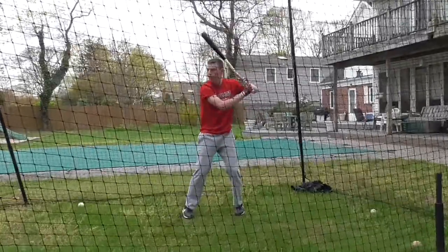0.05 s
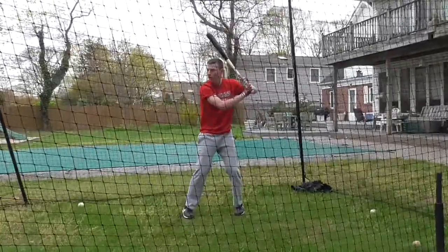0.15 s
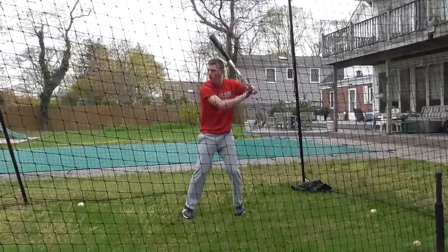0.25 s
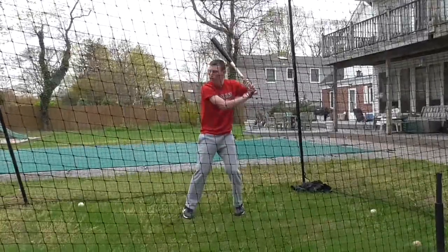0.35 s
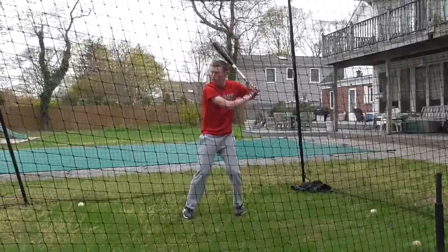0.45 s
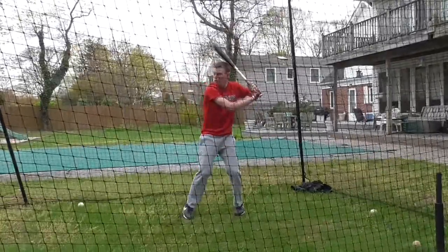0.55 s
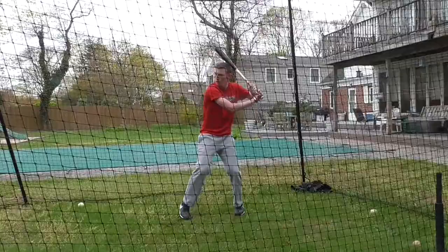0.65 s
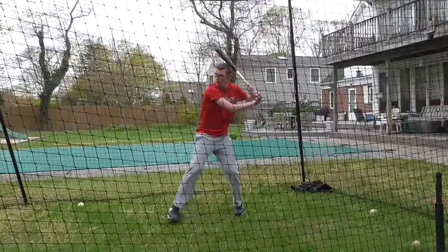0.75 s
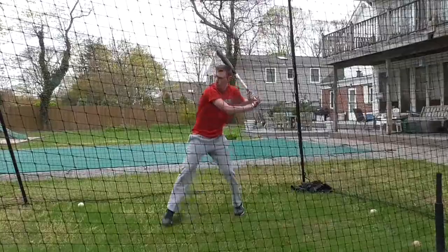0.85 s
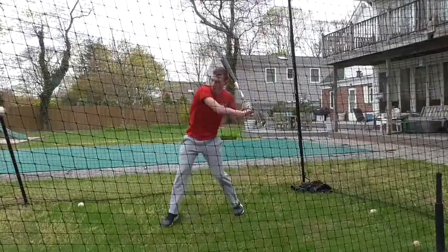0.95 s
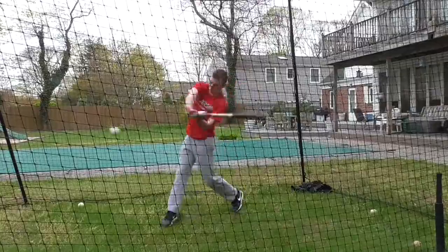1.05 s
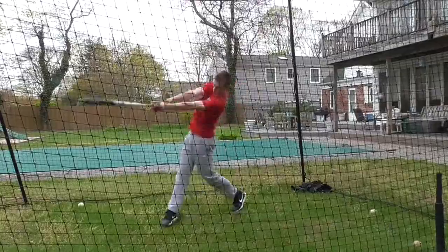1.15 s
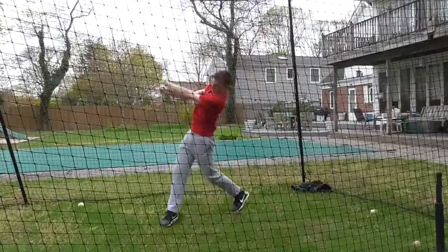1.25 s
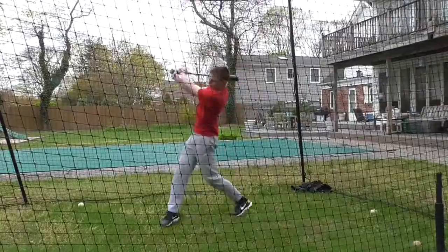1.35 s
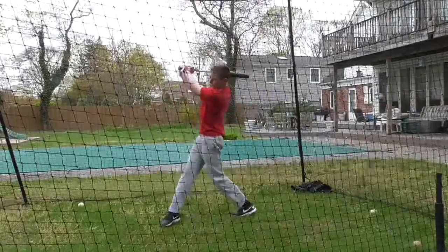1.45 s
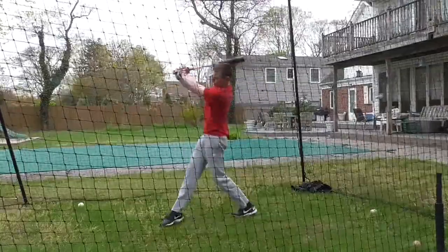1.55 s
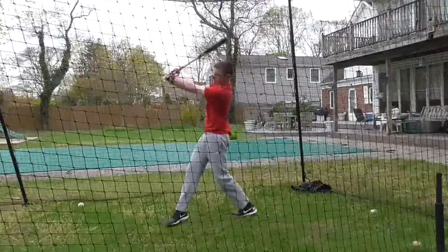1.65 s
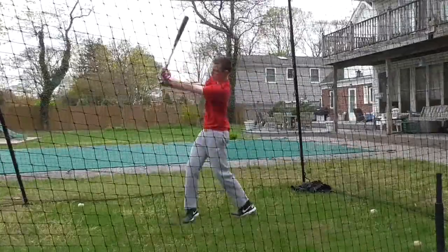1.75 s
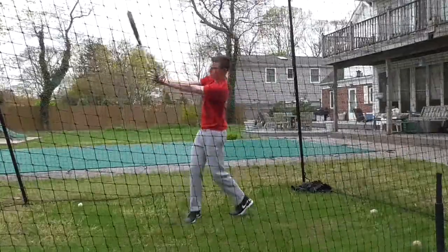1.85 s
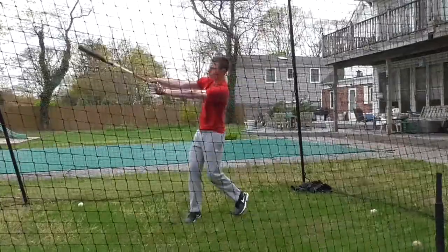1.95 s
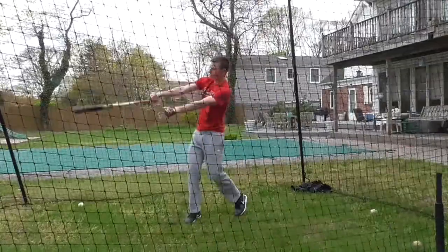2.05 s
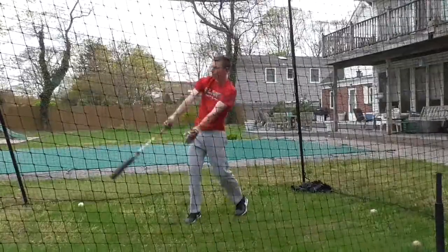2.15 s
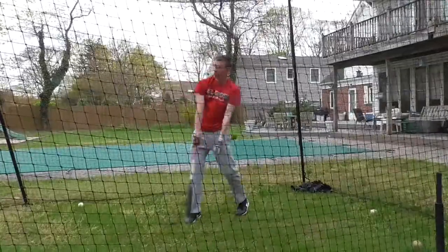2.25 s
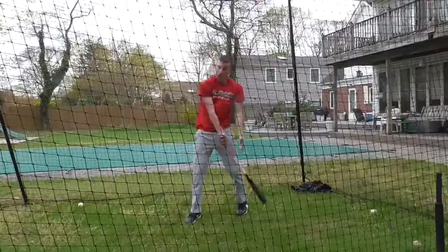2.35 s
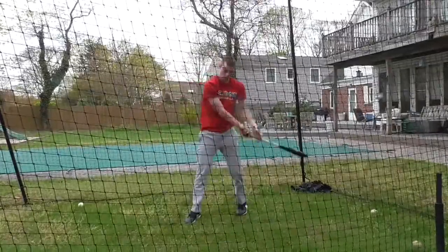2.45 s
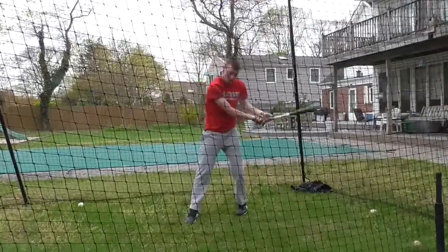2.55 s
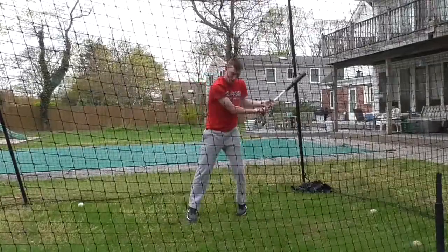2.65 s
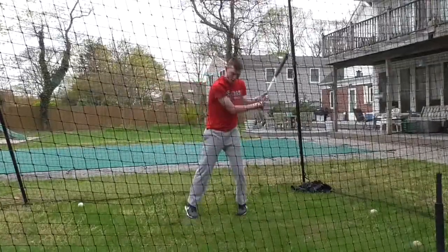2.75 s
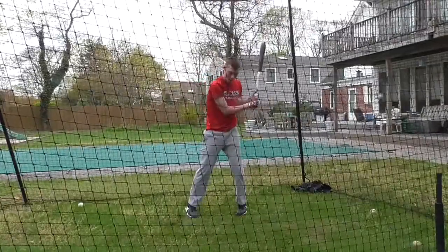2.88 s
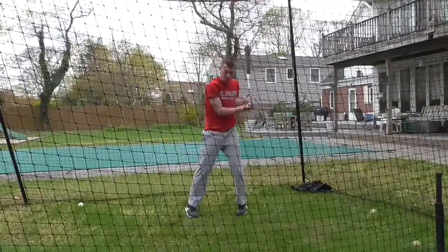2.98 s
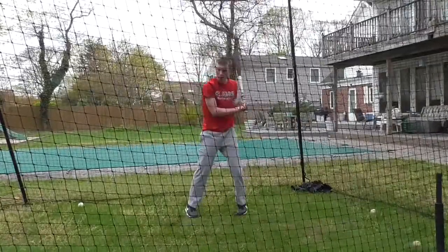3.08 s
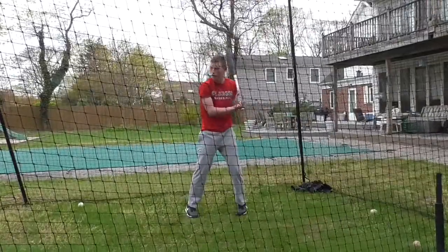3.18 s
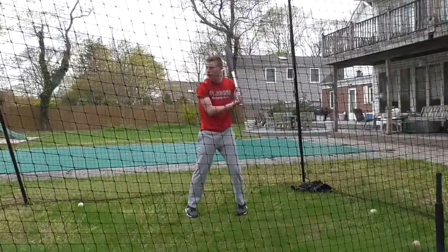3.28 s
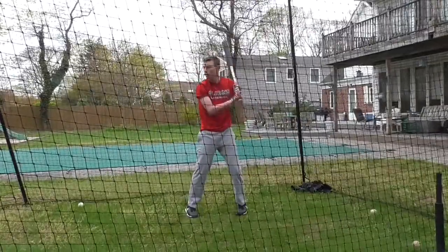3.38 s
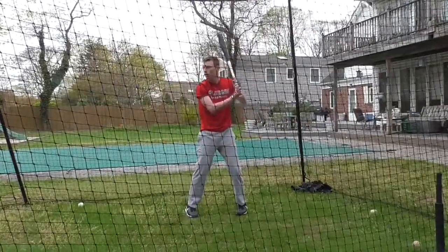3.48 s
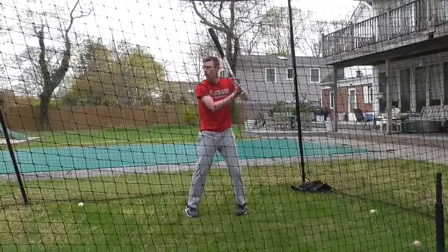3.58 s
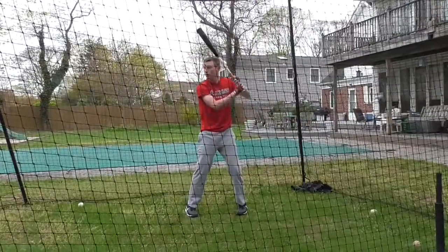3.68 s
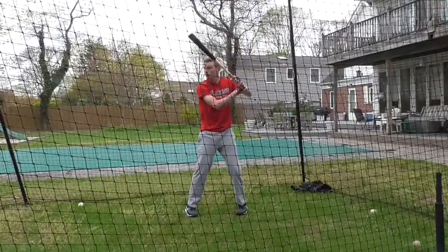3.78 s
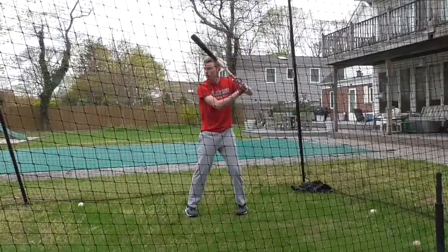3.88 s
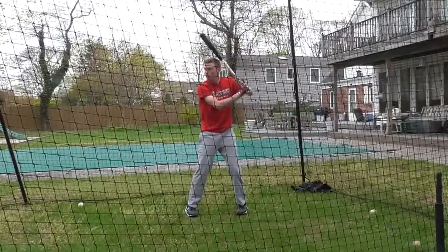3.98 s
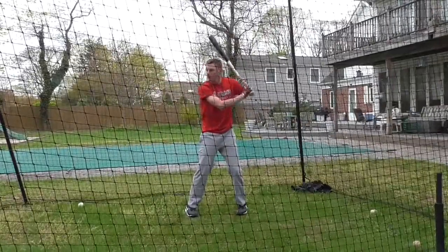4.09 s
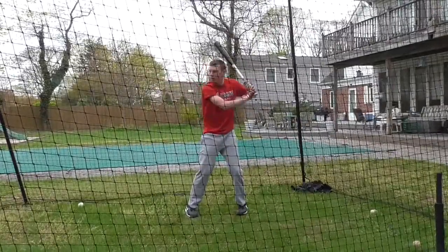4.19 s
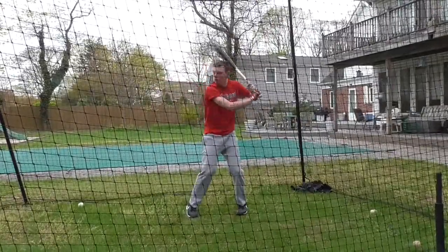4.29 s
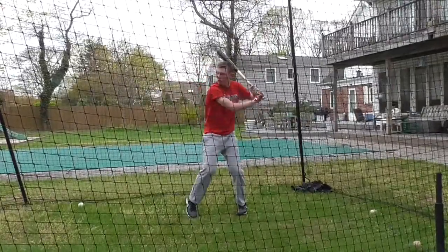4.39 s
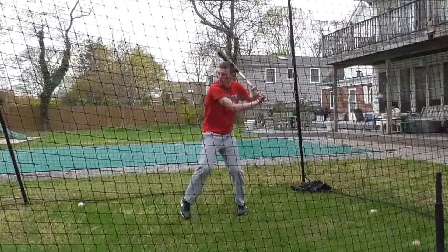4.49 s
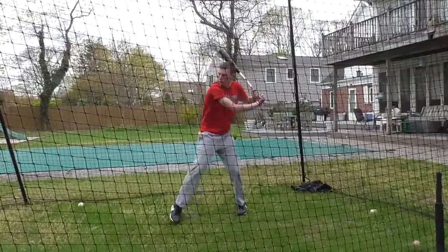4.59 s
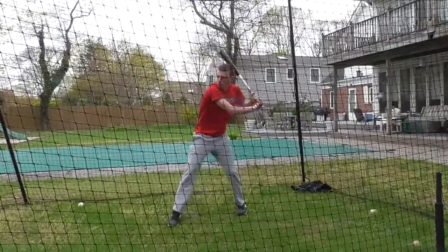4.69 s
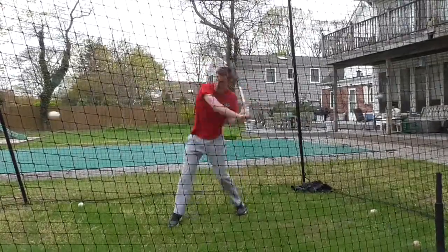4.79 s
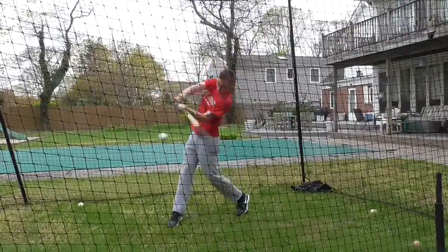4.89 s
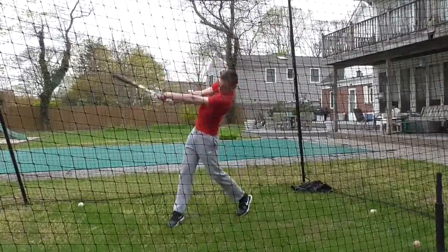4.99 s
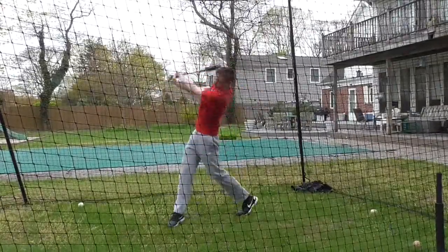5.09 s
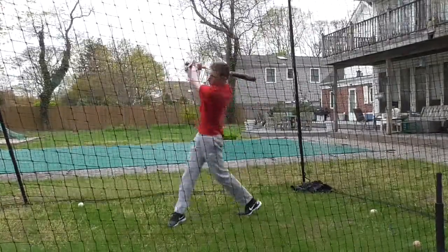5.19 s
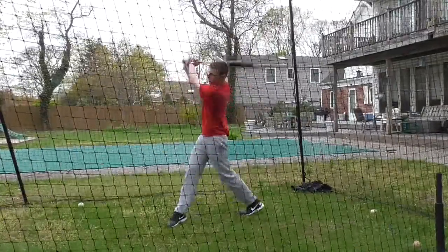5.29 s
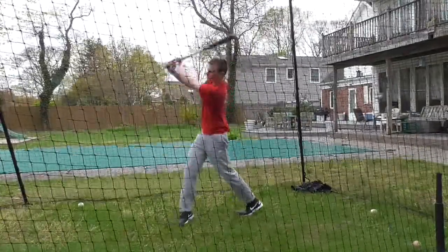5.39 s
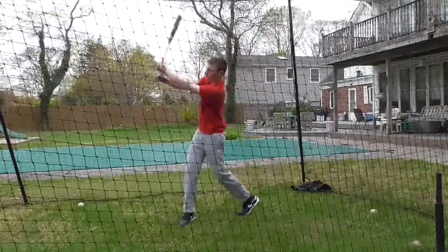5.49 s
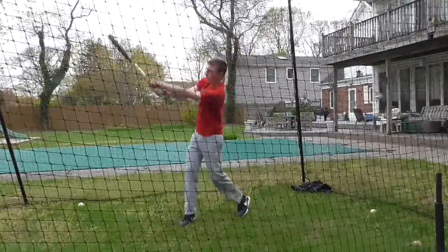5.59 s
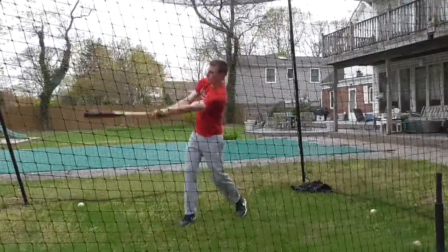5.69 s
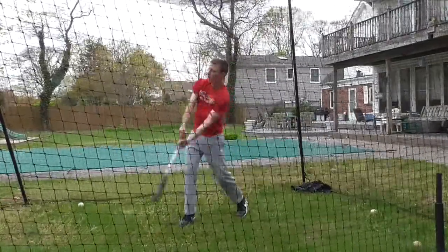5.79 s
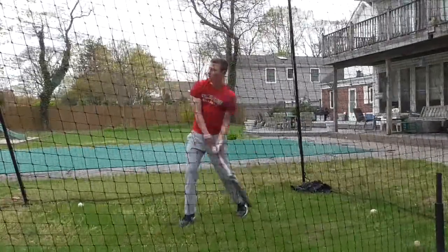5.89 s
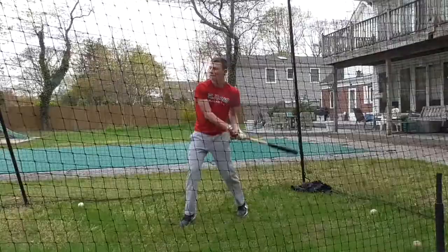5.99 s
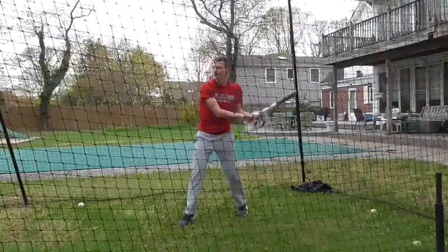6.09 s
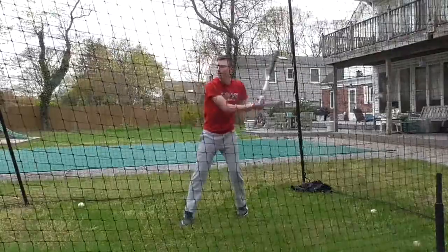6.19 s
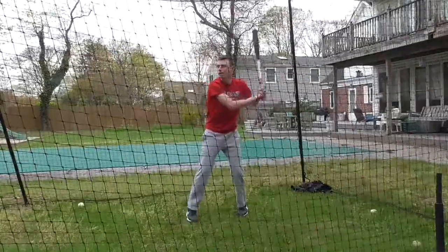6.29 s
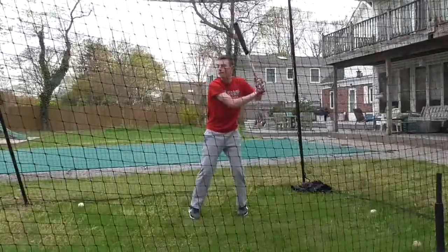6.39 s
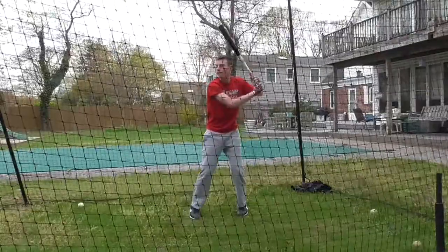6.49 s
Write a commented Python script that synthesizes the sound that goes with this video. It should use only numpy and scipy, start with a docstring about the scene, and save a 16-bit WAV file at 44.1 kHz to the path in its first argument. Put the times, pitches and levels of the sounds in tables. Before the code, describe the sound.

Two sharp, dry bat cracks echo around a quiet backyard, each ball swishing into netting and lightly rattling a metal pole, with small birds and distant traffic.

```python
"""The hum of distant traffic is heard first, with small birds over it: drifting noise, a drone, and gliding tones.
Then come two swings of a bat in a backyard cage, each a dry crack: a pressure pulse, a snap and a short ring.
Lawn, house and a far wall return each crack as delayed, filtered copies and a diffuse tail.
The ball swishes into the net (grainy noise) and drops on the grass (sagging, damped cycles);
the net sways on and rattles a metal pole of the frame (a bank of decaying modes)."""
import sys
import numpy as np
from scipy import signal
from scipy.fft import irfft
from scipy.io import wavfile
from scipy.ndimage import uniform_filter1d

SR = 44100
rng = np.random.default_rng(int(sys.argv[2]) if len(sys.argv) > 2 else 0)


def digitize_waveform(pressure):
    """Quantize a signal to 16-bit integers and store it at the path in sys.argv[1].

    Rows of a 2-D input are taken as channels; values are limited to [-1, 1].
    """
    field = np.atleast_2d(pressure).T
    bounded = np.clip(field, -1, 1)
    quanta = np.round(bounded * 32767).astype(np.int16)
    wavfile.write(sys.argv[1], SR, quanta)


N = 288414  # samples

# Levels are relative within each source; further gains follow in the functions.
# Spectrum of the open air: [f/Hz, level/dB]
AIR_SPECTRUM = [(30, -25.5), (52, -16), (95, 1.5), (190, -2), (350, -7), (900, -3.5), (1300, -11.5),
                (1800, -24), (2500, -33.5), (3800, -37.5), (5800, -44.5), (8000, -37.5), (11500, -35.5),
                (15500, -43.5)]
AIR_DB = -44
TRAFFIC_HZ, TRAFFIC_WIDTH_HZ, TRAFFIC_DB = 850, 220, 0.77  # hump of far tyre noise
# Likeness of left and right in the air: [f/Hz, correlation/1]
AIR_LIKENESS = [(60, 0.97), (150, 0.98), (380, 0.83), (950, 0.49), (2380, 0.43), (5980, 0.34),
                (15000, 0.028)]

# Bird whistles: [t/s, length/s, level/dB, f/Hz]
WHISTLES = [(.235, 0.073, -67, 4300), (.357, .074, -67, 4305), (.615, .15, -65, 4225),
            (0.766, 0.11, -64.5, 4240), (2.16, 0.044, -62, 2500), (2.24, .08, -59, 8100),
            (3.462, .12, -47.5, 3670)]
WHISTLE_SAG = 0.0092  # share by which the pitch starts above and ends below its middle
# Bird buzzes: [t/s, length/s, level/dB, f/Hz, warble depth/Hz, warble rate/Hz]
BUZZES = [(2.391, .11, -51, 4234, 170, 183.5), (2.579, .18, -50.5, 6990, 270, 332),
          (3.32, .034, -66, 2490, 150, 120)]
BUZZ_SCOOP = 0.0244  # share by which a buzz starts flat
# Trills of quick down-sweeps: [t/s, length/s, level/dB, middle f/Hz, sweep interval/s, sweep length/s]
TRILLS = [(2.467, .058, -53, 3550, .02, .022), (2.831, 0.46, -58.5, 4450, .0205, .019)]
ACCENT_AT_S, ACCENT_S, ACCENT_DB = 0.069, 0.03, 7.5  # a trill swells around this age
SWEEP_TOP, SWEEP_END = 1.33, 0.853  # start and end of a sweep as shares of its middle pitch

# Spectrum of rubbing cloth and netting: [f/Hz, level/dB]
CLOTH_SPECTRUM = [(710, -33.5), (1200, -0.5), (1460, -3.5), (1610, -3), (2710, -8.5), (4000, -3),
                  (6100, -6.5), (7500, -3), (11600, -4), (16000, -17)]
STRIDE_LEAD_S, STRIDE_DB, STRIDE_S = 0.085, -66, 0.062  # the stride before the swing
# clothes swish up to each contact; level re the swing
SLEEVES_LEAD_S, SLEEVES_DB, SLEEVES_RISE_S, SLEEVES_DECAY_S = 0.01, -14, 0.063, 0.034
# the first ball grazes the roof of the net on its way
GRAZE_AT_S, GRAZE_DB, GRAZE_RISE_S, GRAZE_DECAY_S = 1.44, -48, 0.023, 0.031
# The net catches the ball and sways: [t/s, swish level/dB, recoil swish level/dB,
# strongest sway t/s, its knock level/dB, loss one sway later/dB]
CATCHES = [(1.551, -31.5, -55, 2.073, -50, 5.2), (5.259, -34.5, -46, 5.603, -54.5, 3.0)]
CATCH_RISE_S, CATCH_DECAY_S = 0.0082, 0.051
RECOIL_S, RECOIL_RISE_S, RECOIL_DECAY_S = 0.13, 0.017, 0.045
SWAY_S = .255  # the net swings against the pole at this interval
SWAY_FADE_POWER = 1.2  # each further sway loses more than the last
SWAY_SWISH_DB, SWAY_RISE_S, SWAY_DECAY_S = -4.5, 0.059, 0.12  # netting rubs at each sway; level re the knock

# Bat on ball: [t/s, thump level/dB, thump f/Hz, crack level/dB, crack f/Hz,
# low barrel ring level/dB, echo level/dB, swing through the air level/dB]
HITS = [(1.2317, -2.5, 466, -8, 3450, -30, 0.5, -39.5), (5.0327, 0, 470, -11, 3500, -9, 2, -45.5)]
# Snap of the contact towards the listener: [f/Hz, level/dB]
SNAP_SPECTRUM = [(900, -18.5), (2000, -8), (3600, -1), (5000, -0.5), (6000, -8), (7500, 2.5), (9000, -5.5),
                 (11000, 1.5), (13500, -6), (16000, -7)]
# Snap summed over all directions: [f/Hz, level/dB]
SNAP_ALL_ROUND = [(900, -26), (2000, -2.5), (3600, 3.5), (6000, -6.5), (11000, 1), (16000, -6.5)]
# Large surfaces round the yard: [delay/s, level/dB, thin below f/Hz, left-right level/dB]
WALLS = [(.0056, -16, 350, 9), (.0078, -24, 160, 1), (.0358, -13.5, 550, -5), (.037, -17, 550, -7),
         (.0502, -23, 500, 2), (.058, -19.5, 700, -10), (.1655, -13.5, 1560, 1)]
WALL_DULL_HZ = 4960  # walls swallow the treble above this
# posts and rails of the deck: a spray of thin echoes
RAILS_FROM_S, RAILS_TO_S, RAILS_DB, RAILS_THIN_HZ = .0245, 0.059, -21, 1500
# Scatter from deck, fence and trees: [f/Hz, level/dB, t60/s]
YARD = [(150, -18.5, 0.54), (400, -7.5, 0.68), (750, -2, 0.74), (1490, 2, 1), (3600, -0.5, 1),
        (6000, -1, 0.88), (10000, -0.5, 0.43), (16000, -11, .3)]

# Dull blows of the ball on net and grass: [t/s, level/dB, nominal f/Hz]
THUDS = [(1.5535, -14.5, 620), (1.5613, -18.5, 304), (1.592, -26, 653), (1.599, -25.5, 200),
         (2.2198, -17.5, 257), (5.262, -33.5, 255), (6.115, -33, 250)]
THUD_CYCLES, THUD_PUFF = 10.8, 0.53  # nominal cycles until a thud has lost 60 dB; weight of its noise
REBOUND_S, REBOUND_DB = .0185, -11  # the ball settles with a second, softer blow

# Modes of the hollow frame pole; the two shortest are the chatter of loose metal: [f/Hz, level/dB, t60/s]
POLE_MODES = [(1836, -11, 0.7), (1862, -8, 0.7), (3220, -28, 0.9), (5160, -13, 0.6), (5250, -11.5, 0.61),
              (5330, 6.5, 0.029), (5354, -12.5, 0.64), (9975, -4.5, 0.45), (10060, -2.5, 0.37),
              (10250, -3, 0.44), (10400, 14.5, 0.0086), (10300, 0, 0.2), (10620, -7, 0.24), (10990, -9, .3)]
POLE_WAVER = 0.00247  # share by which a mode at 1 kHz wavers; higher modes waver more
# The caught ball jerks the pole: [t/s, level/dB, low modes level/dB, cord tick level/dB]
JERKS = [(1.554, -33.5, 0, -21.5), (1.601, -48, 1, -26.5), (1.628, -46, 10, -27)]
JERK_RATTLE_S = .15  # t60
TOUCH_LEAD_S, TOUCH_DB = .054, -5.5  # a lighter touch comes just before each knock
SWAY_LOW_DB, SWAY_TICK_DB, SWAY_RATTLE_S = -20, 9, 0.13  # low modes and cord tick re the knock; rattle t60

OVERLOAD = 1  # the recorder rounds off peaks towards this share of full scale
EDGE_HZ = 15950  # band limit of the recorder


def amp(db):
    """Level law: decibels to an amplitude ratio."""
    return 10 ** (np.asarray(db) / 20)


def evened(x):
    """Normalisation: scales a signal to rms 1."""
    return x / np.sqrt(np.mean(x ** 2) + 1e-20)


def read(points, hz, axis=1):
    """Interpolation: reads one column of a table on a log-frequency axis."""
    table = np.transpose(points)
    return np.interp(np.log(hz + 1), np.log(table[0] + 1), table[axis])


def seconds(length):
    """Sampling: a time axis in s."""
    return np.arange(int(length * SR)) / SR


def add(mix, s, sound):
    """Superposition: mixes a sound in at time s."""
    part = mix[..., max(round(s * SR), 0):][..., :sound.shape[-1]]
    part += sound[..., :part.shape[-1]]


def filtered(x, hz, kind, order=2):
    """Linear filtering: a Butterworth low-pass or high-pass."""
    return signal.sosfilt(signal.butter(order, min(hz, .49 * SR), kind, fs=SR, output="sos"), x)


def coloured(x, points):
    """Minimum phase: a causal filter of unit energy with the given spectrum."""
    log_gain = np.log(amp(read(points, abs(np.fft.fftfreq(2048, 1 / SR)))))
    taps = np.fft.ifft(np.exp(np.conj(signal.hilbert(log_gain)))).real
    return signal.oaconvolve(x, taps[None] / np.linalg.norm(taps), axes=1)[:, :x.shape[1]]


def pair(size, likeness):
    """Interaural correlation: two partly alike noises, one for each ear."""
    a, b = rng.standard_normal((2, size))
    c = np.clip(likeness, -1, 1)
    return np.array([a, c * a + np.sqrt(1 - c ** 2) * b])


def pan(db):
    """Interaural level difference: left and right gains."""
    return amp([[db / 2], [-db / 2]])


def scatter(x, bands, onset):
    """Diffuse reverberation: many small echoes set in late and die at their own speed in each band."""
    t = seconds(1.0)
    taps = pair(len(t), 0.49) * (rng.random(len(t)) < 7000 / SR)
    hz, age, z = signal.stft(taps, SR, nperseg=256)
    fade_db = -60 * age / read(bands, hz, axis=2)[:, None]
    tail = signal.istft(z * amp(read(bands, hz)[:, None] + fade_db), SR, nperseg=256)[1][:, :len(t)]
    late = np.maximum(t - onset, 0)
    tail *= np.clip(t / onset, 0, 1) ** 5
    tail *= 1 + 0.9 * np.exp(-late / 0.013)  # the earliest echoes are stronger
    return signal.fftconvolve(x, tail / np.linalg.norm(tail[0]), axes=1)[:, :N]


def air():
    """Random noise: far traffic and hiss in slowly drifting patches, with a distant engine's low drone."""
    frames, hz = N // 512 + 5, np.fft.rfftfreq(2048, 1 / SR)
    a, b, c, d, patches = rng.standard_normal((5, len(hz), frames))
    patches = uniform_filter1d(patches, 12, axis=0)
    patches_db = evened(uniform_filter1d(patches, 12, axis=1))
    same = np.clip(read(AIR_LIKENESS, hz), -1, 1)[:, None]
    left = a + 1j * b
    right = same * left + np.sqrt(1 - same ** 2) * (c + 1j * d)
    hump = np.exp(-((hz - TRAFFIC_HZ) / TRAFFIC_WIDTH_HZ) ** 2)
    colour_db = read(AIR_SPECTRUM, hz) + TRAFFIC_DB * hump
    z = np.array([left, right]) * amp(colour_db[:, None] + patches_db)
    wash = evened(signal.istft(z, nperseg=2048, noverlap=1536)[1][:, :N])
    drone_hz = 74 + 2.53 * evened(filtered(rng.standard_normal(N), 4.5, "low"))
    throb = 1 + .35 * evened(filtered(rng.standard_normal(N), 4.2, "low"))
    drone = np.sin(2 * np.pi * np.cumsum(drone_hz) / SR) * throb
    return amp(AIR_DB) * filtered(wash, 43, "high") * pan(0.36) + amp(-54.5) * drone


def note(length, db, start_hz, middle_hz, end_hz, warble_hz, rate_hz):
    """Frequency modulation: a near-pure whistle on an arched glide; a fast warble makes it buzz."""
    t = seconds(length)
    hz = np.polyval(np.polyfit([0, .5, 1], [start_hz, middle_hz, end_hz], 2), t / length)
    hz += warble_hz * np.sin(2 * np.pi * rate_hz * t)
    hz += 18 * evened(uniform_filter1d(rng.standard_normal(len(t)), 120))  # slight unsteadiness
    return amp(db) * signal.windows.tukey(len(t), .55) * np.sin(2 * np.pi * np.cumsum(hz) / SR)


def birds():
    """Gliding tones: whistles, buzzes and uneven trills of down-sweeps, echoing among the trees."""
    song = np.zeros((2, N))
    for s, length, db, hz in WHISTLES:
        add(song, s, note(length, db, hz * (1 + WHISTLE_SAG), hz, hz * (1 - WHISTLE_SAG), 0, 0))
    for s, length, db, hz, *warble in BUZZES:
        add(song, s, note(length, db, hz * (1 - BUZZ_SCOOP), hz, hz, *warble))
    for s, length, db, middle_hz, every_s, sweep_s in TRILLS:
        ages = np.arange(0, length, every_s)
        for age, (late, louder, higher) in zip(ages, rng.standard_normal((40, 3))):
            hz = middle_hz * (1 + 0.0254 * higher)
            accent_db = ACCENT_DB * np.exp(-((age - ACCENT_AT_S) / ACCENT_S) ** 2)
            fade_db = -6 * abs((2 * age + sweep_s) / length - 1) ** 6  # both ends are soft
            sweep_db = db + accent_db + fade_db + 1.1 * louder
            sweep = note(sweep_s, sweep_db, hz * SWEEP_TOP, hz, hz * SWEEP_END, 0, 0)
            add(song, s + age + .0014 * late, sweep)
    nearby = scatter(song, [(2000, 0, 0.16), (8000, 0, 0.068)], onset=0.0038)
    woods = scatter(song, [(1980, 0, 1.1), (4000, 0, 1.55), (8140, 0, 0.63)], onset=0.026)
    return amp(-2.5) * song + amp(-8) * nearby + amp(-6.5) * woods


def swell(s, db, rise, decay):
    """Envelope of friction power: a smooth rise to its peak at s and an exponential decay."""
    t = np.arange(N) / SR - s
    return amp(db) ** 2 * np.exp(-np.where(t < 0, (t / rise) ** 2, 2 * t / decay))


def sways():
    """Damped oscillation: (t/s, level/dB) of each swing of the net on the pole, building up, then dying."""
    return [(s + k * SWAY_S, db - loss_db * abs(k) ** SWAY_FADE_POWER)
            for *_, s, db, loss_db in CATCHES for k in range(-1, 4)]


def knocks():
    """Impacts on the pole: (t/s, level/dB, low modes/dB, tick/dB, rattle t60/s), jerks, then two per sway."""
    light = sways() + [(s - TOUCH_LEAD_S, db + TOUCH_DB) for s, db in sways()]
    jerks = [(*jerk, JERK_RATTLE_S) for jerk in JERKS]
    return jerks + [(s, db, SWAY_LOW_DB, db + SWAY_TICK_DB, SWAY_RATTLE_S) for s, db in light]


def swishes():
    """Friction noise: fibres of clothes and netting slide in tiny grains; a cord snaps tight at each knock."""
    power, ticks = swell(GRAZE_AT_S, GRAZE_DB, GRAZE_RISE_S, GRAZE_DECAY_S), np.zeros((2, N))
    for s, *_, swing_db in HITS:
        power += swell(s - STRIDE_LEAD_S, STRIDE_DB, STRIDE_S, STRIDE_S)
        power += swell(s - SLEEVES_LEAD_S, swing_db + SLEEVES_DB, SLEEVES_RISE_S, SLEEVES_DECAY_S)
    for s, db, recoil_db, *_ in CATCHES:
        power += swell(s, db, CATCH_RISE_S, CATCH_DECAY_S)
        power += swell(s + RECOIL_S, recoil_db, RECOIL_RISE_S, RECOIL_DECAY_S)
    for s, db in sways():
        power += swell(s, db + SWAY_SWISH_DB, SWAY_RISE_S, SWAY_DECAY_S)
    grain = amp(2.0 * evened(uniform_filter1d(rng.standard_normal(N), 70)))
    age = seconds(.02)
    for s, _, _, tick_db, _ in knocks():
        add(ticks, s, amp(tick_db) * np.exp(-age / 0.0012) * pair(len(age), 0.17))
    return coloured(pair(N, 0.24) * np.sqrt(power) * grain + ticks, CLOTH_SPECTRUM)


def whoosh(db):
    """Aerodynamic noise: the barrel tears through the air, loudest just before contact."""
    t = seconds(.16) - .1  # contact at zero
    wind = evened(filtered(filtered(pair(len(t), 0.95), 650, "low"), 190, "high"))
    return amp(db) * wind * np.exp(-((t + 0.0072) / 0.024) ** 2)


def crack(thump_db, thump_hz, crack_db, crack_hz, ring_db):
    """Impulsive contact: the ball stops within a millisecond, giving a pulse, a snap and a barrel ring."""
    t = seconds(.05)
    pulse = np.exp(-t / 0.00068) * np.cos(2 * np.pi * thump_hz * t)
    pulse = filtered(filtered(pulse, 1275, "low", order=3), 230, "high")
    thump = amp(thump_db) * 0.65 * pulse / abs(pulse).max() * pan(1.1)
    grit = pair(len(t), 0.31)
    grit /= np.sqrt(uniform_filter1d(grit ** 2, 16, axis=1))  # flattens the noise's own envelope
    snap_decay = np.exp(-t / 0.00036) + amp(-12.5) * np.exp(-t / 0.0056)
    snap = coloured(grit * snap_decay, SNAP_SPECTRUM)
    barrel = amp(-8) * np.exp(-t / 0.0012) * np.sin(2 * np.pi * crack_hz * t)
    barrel += amp(ring_db) * np.exp(-t / 0.0021) * np.sin(2 * np.pi * 2230 * t)
    all_round = coloured(amp(15.5) * signal.unit_impulse(len(t))[None], SNAP_ALL_ROUND)
    return thump, amp(crack_db) * (snap + barrel), amp(crack_db) * all_round


def flex(db):
    """Damped bending: the whole bat bends and the hands damp it within a few cycles."""
    t = seconds(.05)
    envelope = np.exp(-t / 0.0043) * (1 - np.exp(-t / 0.00095))
    return amp(db - 17) * envelope * -np.sin(2 * np.pi * 275 * t)


def bat():
    """Reflection: each crack comes straight and off the lawn, then from walls, deck and trees."""
    near, aimed, spread = np.zeros((3, 2, N))
    for s, *blow, echo_db, swing_db in HITS:
        thump, snap, all_round = crack(*blow)
        add(near, s - .1, whoosh(swing_db))
        add(near, s, thump + snap + flex(blow[0]))
        add(near, s + 0.00191, amp(-0.5) * filtered(thump, 1640, "low", order=1))  # soft turf blunts the pulse
        add(near, s + .0022, amp(-4.5) * snap)
        add(aimed, s, amp(echo_db) * (thump + snap))
        add(spread, s, amp(echo_db) * (thump + all_round))
    dulled = filtered(aimed, WALL_DULL_HZ, "low")
    for delay, db, thin_hz, side_db in WALLS:
        add(near, delay, amp(db) * pan(side_db) * filtered(dulled, thin_hz, "high"))
    thinned = amp(RAILS_DB) * filtered(aimed, RAILS_THIN_HZ, "high")
    count = 6
    delays = np.linspace(RAILS_FROM_S, RAILS_TO_S, count)
    for delay, (late, side) in zip(delays, rng.standard_normal((count, 2))):
        add(near, delay + .0008 * late, pan(3 + 2.5 * side) * thinned / np.sqrt(count))
    return near + amp(-13.5) * scatter(spread, YARD, onset=0.029)


def thuds():
    """Damped soft impact: a few sagging cycles and a dull puff, then a small rebound."""
    out, t = np.zeros((2, N)), seconds(.2)
    rebounds = [(s + REBOUND_S, db + REBOUND_DB, hz) for s, db, hz in THUDS]
    for s, db, hz in THUDS + rebounds:
        push = -np.sin(2 * np.pi * hz * np.cumsum(0.894 + 0.15 * np.exp(-t / 0.014)) / SR)
        puff = filtered(pair(len(t), 0.56), hz * 1.35, "low", order=3)
        puff = evened(filtered(puff, hz / 2, "high"))
        envelope = amp(db - 60 * t * hz / THUD_CYCLES) * (1 - np.exp(-t * hz * 3)) ** 2
        add(out, s, envelope * (push + THUD_PUFF * puff))
    return out


def pole():
    """Modal resonance: the shaken net rattles the tube; modes waver, and light touches favour the high ones."""
    t, age, out = np.arange(N) / SR, seconds(.4), np.zeros((2, N))
    high, low = np.zeros((2, N))  # forces on the high and low modes
    for s, db, low_db, _, rattle_t60 in knocks():
        blows = rng.standard_normal(len(age)) * (rng.random(len(age)) < 600 / SR)
        blows *= amp(-60 * age / rattle_t60)
        blows[0] = 1
        blows *= amp(db) / np.linalg.norm(blows)
        add(high, s, blows)
        add(low, s, amp(db + low_db) * np.ones(1))  # only the first push bends the whole tube
    for hz, mode_db, t60 in POLE_MODES:
        waver = np.interp(t, np.linspace(0, t[-1], 600), rng.standard_normal(600))
        mode_hz = hz * (1 + POLE_WAVER * np.sqrt(hz / 1000) * waver)
        turn = np.exp(2j * np.pi * np.cumsum(mode_hz) / SR)
        force = low if hz < 2500 else high
        # a one-pole decay in the frame turning with the mode
        ring = turn * signal.lfilter([1], [1, -amp(-60 / (t60 * SR))], force * turn.conj())
        out += amp(mode_db) * (ring * np.exp(1j * rng.normal(0, 1.0, (2, 1)))).real
    return out


def scene():
    """Superposition: the air of the yard, birds, batter and cage."""
    background = air() + birds()
    cage = swishes() + thuds() + pole()
    return background + bat() + cage + amp(-14) * scatter(cage, YARD, onset=0.034)


def ports(x):
    """Phase difference: two close microphone ports hear the upper treble out of step."""
    hz = np.fft.rfftfreq(2048, 1 / SR)
    # [f/Hz, phase/rad]
    lead = read([(3500, 0.011), (5500, 0.59), (8000, 2.0), (10500, 0.47), (16000, 0.039)], hz)
    taps = np.roll(irfft(np.exp(.5j * np.array([lead, -lead]))), 128, axis=1)[:, :257]
    return signal.oaconvolve(x, taps, "same", axes=1)


def record(dry):
    """Saturation and band limiting: the port pair, a soft overload on peaks, and a steep low-pass."""
    rounded = OVERLOAD * np.tanh(ports(dry) / OVERLOAD)
    band_limit = signal.firwin(301, EDGE_HZ, window=("kaiser", 8), fs=SR)
    return signal.oaconvolve(rounded, band_limit[None], "same")


dry = scene()
out = record(dry)
digitize_waveform(out)
```